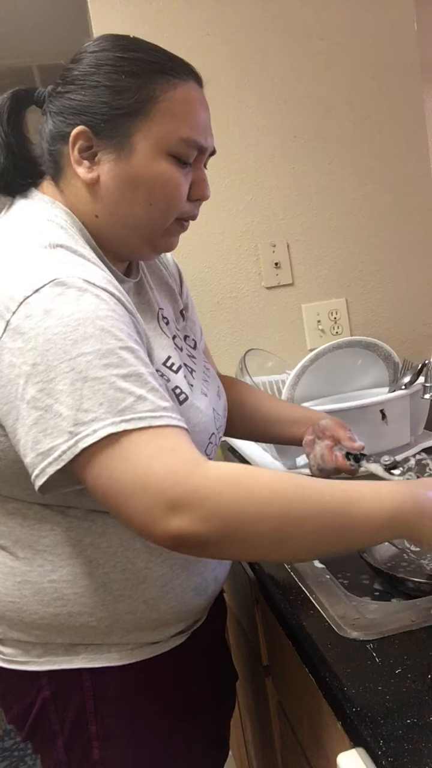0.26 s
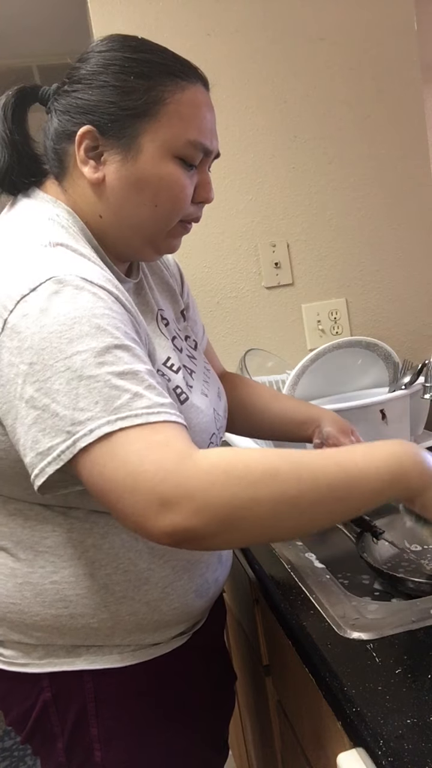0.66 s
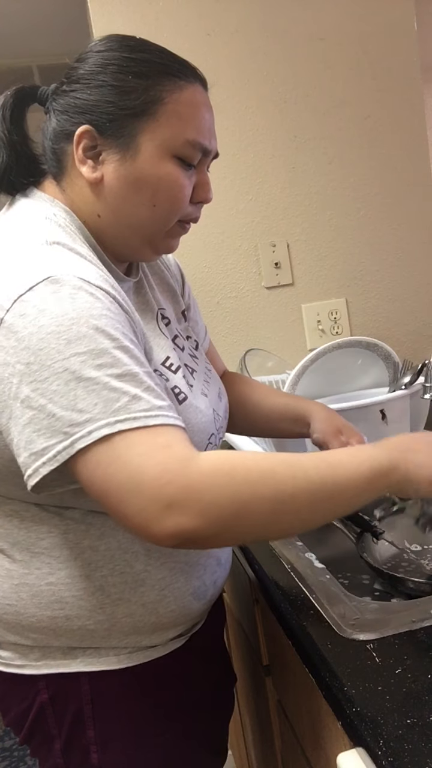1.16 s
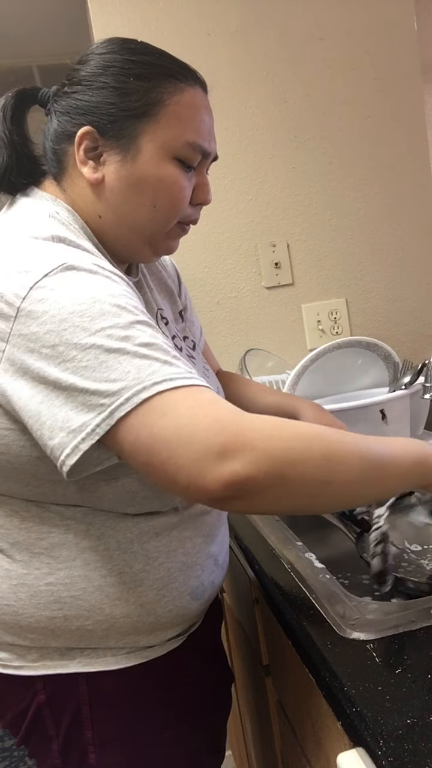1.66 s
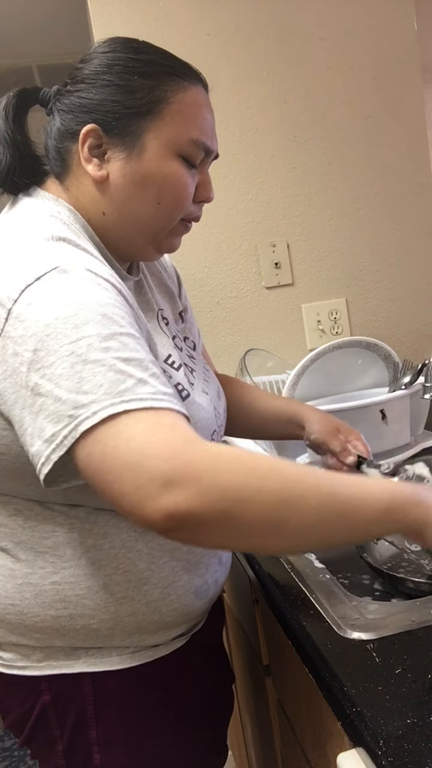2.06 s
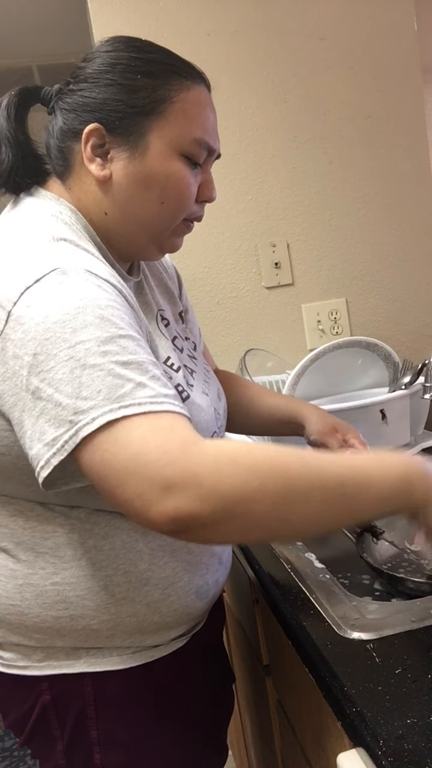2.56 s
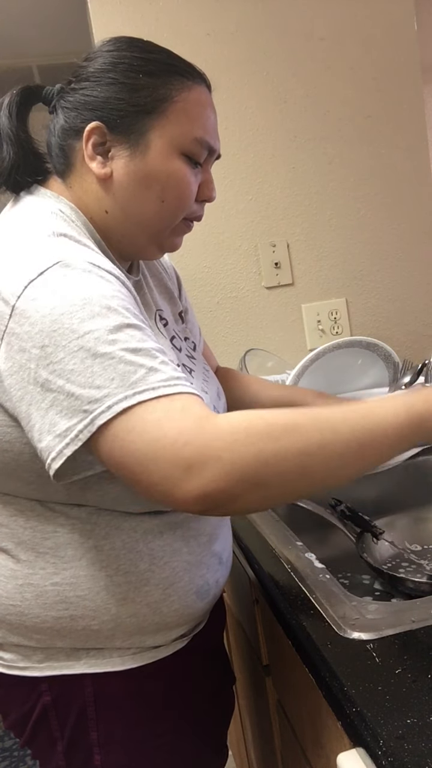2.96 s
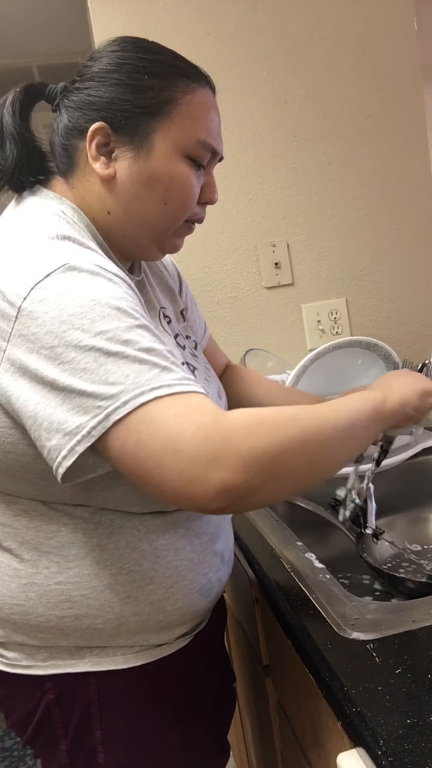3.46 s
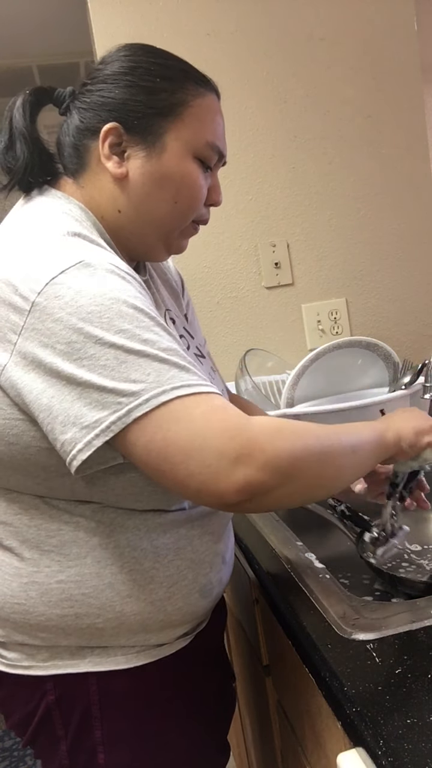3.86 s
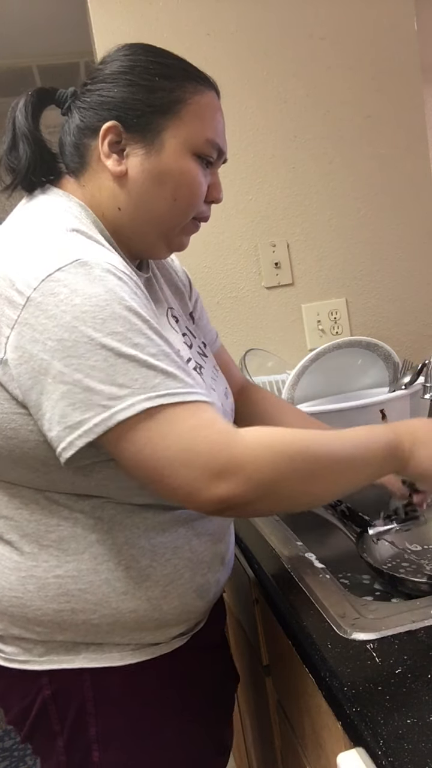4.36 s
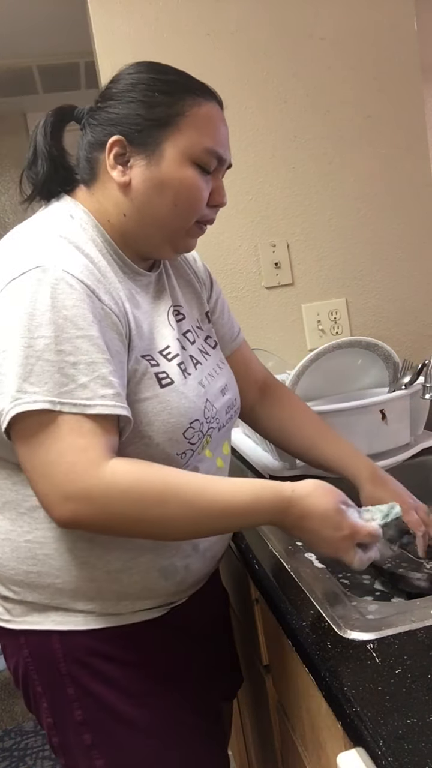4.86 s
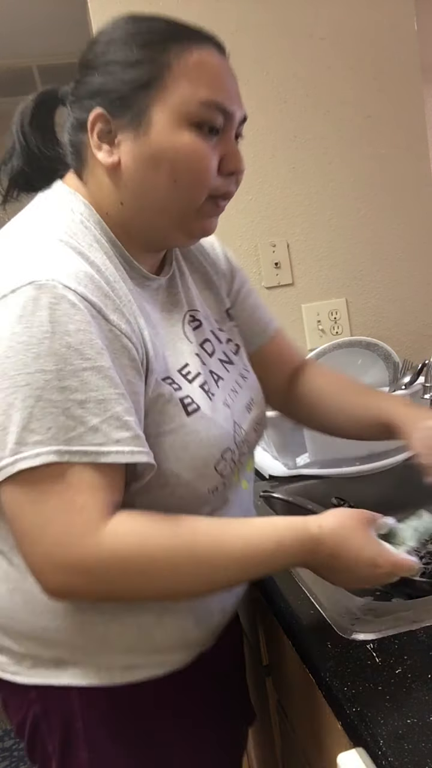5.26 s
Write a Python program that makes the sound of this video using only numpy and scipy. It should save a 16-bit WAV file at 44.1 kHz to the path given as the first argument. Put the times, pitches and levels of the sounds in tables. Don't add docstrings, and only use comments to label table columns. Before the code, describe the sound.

Quiet wet cloth squelches, rubs and small metal ticks at a kitchen sink, then a pan crashes loudly into the steel basin and bounces, ringing.

```python
import sys
import numpy as np
from scipy import signal
from scipy.fft import rfft, irfft
from scipy.io import wavfile
from scipy.ndimage import uniform_filter1d

SR = 44100
rng = np.random.default_rng(int(sys.argv[2]) if len(sys.argv) > 2 else 0)


def digitize_waveform(pressure):
    field = np.atleast_2d(pressure).T
    bounded = np.clip(field, -1, 1)
    quanta = np.round(bounded * 32767).astype(np.int16)
    wavfile.write(sys.argv[1], SR, quanta)


def voltage_ratio(decibels):
    exponent = np.asarray(decibels, float) / 20
    return 10 ** exponent


N = 243431

# start_s, ring_level_db, free_ring_s, rocking_level_db, crash_level_db
BOUNCES = [
    (4.8289, -18.5, 0.032, -19, -13.5),
    (5.0716, -6.5, 0.021, -20.5, -18),
    (5.2773, -19, 0.025, -34, -32.5),
    (5.4788, -28.5, 0.0054, -39.5, -51.5),
]
# pitch_hz, level_db at bounces 1, 2, 3, 4
WALL_MODES = [(769, 1.5, -32, -46, -21), (849, 8, -1, -1, 1.5), (928.5, 3, -14, -25, -20),
              (1380, -16, -33, -33, -25), (1518, 6.5, -24, -14.5, 0), (1595, 3, -38, -25, -7),
              (1628, -20, -3.5, -27, -25), (2040, -11, -26, -21, -11), (2427, -14, -15.5, -19, -6),
              (2632, -27, -6, -18, -8), (3035, -2.5, -8.5, -16.5, -16), (3030, -10, -12, -20, -7.5),
              (3855, -19, -12, -17, -15), (4175, 2, -22, -20, -24)]
# pitch_hz, level_db
RIM_MODES = [(1870, -21), (3420, -25), (4350, -3), (4770, -23), (5340, -9), (5730, -6), (6270, -13),
             (6810, -12), (7075, -8.5), (7840, -19), (9395, -13), (10100, -19.5), (11250, -22),
             (12250, -23)]
# pitch_hz, level_db
HANDLE_MODES = [(1225, -9), (1736, -10), (2240, -15), (4630, -17), (5150, -19), (5920, -15), (8060, -18),
                (8480, -25), (8710, -29), (9220, -22), (11800, -21), (12400, -17), (13050, -26),
                (13800, -30)]
# free_level_db, rocking_level_db, slope_db_per_khz
RIM_SHARE = [(0, -7, 0.04), (-19, -6.5, -0.06), (-20, -6, -1), (-12, -8, -1.75)]
# pitch_hz, width_hz, level_db after bounce 1, after 2, after both 3 and 4
ROCKING_MODES = [(860, 63, -1.5, 1, -2), (1076, 15, -29, -25, -7), (1539, 55, 0, -16.5, -3),
                 (1620, 42, -7, -7, -3), (2460, 25, -16, -7, -18), (2600, 40, -16, -8, -2.5),
                 (2750, 36, -26, -1.5, -10), (2900, 22, -22, -5, -14), (3080, 115, -16, -4.5, -12),
                 (3200, 25, -16, -12, -9), (3770, 76, -16, -10, -11), (3970, 20, -22, -19, -12),
                 (4190, 38, -6, -9, -7), (5550, 61, -18, -17, -26)]
ROCKING_T60 = [0.53, 0.31, 0.38, 0.32]
# start_s, level_db re rocking
JOLTS = [(4.876, -4.5), (4.986, -19), (5.038, -13), (5.137, -20.5), (5.2, -12.5)]
# pitch_hz, level_db
CRASH_COLOUR = [(250, -29.5), (600, -26.5), (850, 1.5), (1200, -14), (1600, -9), (2200, -17), (3000, -12.5),
                (4300, -9.5), (5000, -21), (8000, -25.5), (16000, -72)]
# pitch_hz, level_db, t60_s
BASIN_MODES = [(59.8, -2, 0.64), (79, -6, 0.1), (165.5, -1, 0.49), (229.2, -0.5, 0.43), (293, -1.5, .9),
               (311.3, -6, 0.72), (386, -9, 0.38), (444, -9, 0.29), (542, -9, 0.37)]
THUD_DB = [-31, -41.5, -56, -51]
# start_s, level_db
BUMPS = [
    (2.14, -55.5),
    (2.201, -67),
    (4.118, -78),
]
# start_s, level_db, t60_s
SPRAY = [
    (4.829, -22.5, 0.018),
    (4.832, -37, 0.61),
    (4.985, -44.5, 0.12),
    (5.071, -38.5, 0.28),
    (5.277, -71, 0.25),
    (5.313, -66, 0.12),
]
# pitch_hz, level_db
SPRAY_COLOUR = [(5000, -26), (9000, -2.0), (12300, -8), (13500, -7), (16000, -7.5)]

# start_s, effort_db, soak_db (plus is soggy and low, minus foamy and high)
WRINGING = [(0.0, -78.5, 3), (.33, -73.5, 1.5), (.52, -77, 1.5), (.73, -81, -2), (1.02, -71, 2),
            (1.38, -72, -0.5), (1.53, -63, 0.5), (1.68, -87, -8), (1.84, -71.5, 0.5), (2.17, -81, -2),
            (2.37, -74, 0.1), (2.7, -79, 2.1), (3.66, -77.5, -1), (3.78, -73, -2), (4.02, -73, 1),
            (4.37, -64.5, 0.5), (4.54, -79, 8.5), (4.8, -70.5, -6.5)]
# pitch_hz, level_db
SQUELCH = [(400, -40.5), (800, 6), (1500, 3.5), (2300, 4), (3200, -36.5)]
SLOSH = [(1800, -12.5), (2800, 0), (4200, -1.5), (5200, -20), (7000, -32)]
FIZZ = [(3800, -13), (5200, 10), (7000, 8), (8200, -14), (12000, -2), (16000, -11)]
# offset_db, soak_share (ratio)
LAYERS = [(-0.5, 1.01), (-1.5, -1.01), (-7, -0.96)]
# start_s, length_s, pitch_hz (centre),
# width_hz, level_db
STROKES = [(0.238, 0.053, 4140, 3540, -63.5), (1.312, 0.14, 1620, 900, -65), (1.324, 0.12, 3800, 1500, -67),
           (1.473, 0.13, 1710, 1100, -60.5), (1.56, 0.069, 1710, 1060, -51.5),
           (1.574, 0.065, 3330, 1800, -54), (2.096, 0.059, 2190, 500, -66),
           (2.133, 0.052, 1270, 940, -55.5), (2.353, 0.1, 1580, 915, -67.5),
           (2.444, 0.026, 1510, 2070, -54), (3.767, 0.094, 3080, 1620, -54.5),
           (3.807, 0.041, 2220, 800, -53.5), (4.349, 0.085, 3460, 1810, -58),
           (4.803, 0.045, 1970, 2540, -45), (3.401, 0.03, 1880, 696, -63.5),
           (1.646, .022, 2600, 2520, -51.5), (5.422, 0.1, 2150, 1880, -56)]
# start_s, length_s, pitch_hz, level_db
SQUEAKS = [
    (2.683, 0.18, 2040, -73.5),
    (3.81, 0.097, 1860, -67.5),
    (4.738, 0.06, 1360, -67),
]

# start_s, ping_level_db, low_knock_db re ping, middle_ring_db re ping
TICKS = [(0.262, -44, -13, -4), (0.7462, -56.5, -7, -11), (0.776, -46.5, 6, 4.5), (0.9142, -59, 3, 6.5),
         (1.327, -50.5, -7, -4), (1.4864, -56, 12, -5), (1.4992, -48.5, 2, -19), (1.8393, -53.5, 2, -14),
         (2.1365, -59.5, 21, 1), (2.398, -50, -12, -16), (2.605, -51, -5, 7.5), (3.0684, -64.5, -2, 13.5),
         (3.4096, -61, 3, 8), (3.8013, -45.5, 3.5, -8),  (5.4428, -57, 23.5, 17)]
# start_s, ping_level_db
DRIPS = [(0.1294, -65), (0.3594, -62), (0.398, -59.5), (1.0176, -59), (1.1529, -57), (2.0076, -57.5),
         (2.377, -61), (2.8292, -65), (3.312, -60), (3.836, -53), (0.697, -62), (3.585, -70)]
# start_s, ping_level_db, then re ping low_knock_db, middle_ring_db, treble_db
CLINKS = [(0.2514, -59.5, 8, 7, -7), (1.1668, -38.5, -7, -5, -6), (1.6497, -41, 1, 1.5, -6),
          (2.4502, -58, 11, -1, -5), (4.4085, -40, -5, -1, -10.5), (4.521, -46, -7, -1, -13),
          (4.786, -36.5, 1, -2, -18), (1.5759, -47, 1, -5, -25), (4.2877, -36.5, -6, -6.5, -15),
          (3.6142, -36.5, -7.5, -3.5, -9)]
# start_s, ping_level_db, low_knock_db re ping, middle_ring_db re ping
SNAPS = [(2.016, -48.5, -5, -15), (3.819, -51, -7, -1), (4.37, -49, -17, -8), (4.3763, -37, -20, -5),
         (4.398, -35.5, -11, -7)]

# pitch_hz, t60_s
ROOM_T60 = [(200, 1), (800, 0.25), (2000, 0.64), (5000, 0.42), (10000, 0.56), (16000, 0.13)]
# pitch_hz, level_db
AIR_COLOUR = [(20, -45), (35, -9.5), (60, -6), (100, -7), (160, -5.5), (250, -9), (450, -15), (560, -22),
              (1000, -23.5), (1700, -27.5), (3000, -35), (4500, -39), (8000, -45), (16000, -52)]
# pitch_hz, width_hz, level_db
HUM_LINES = [(63.2, 8.3, -79), (147.4, 14.4, -66), (170.6, 9.9, -66), (231, 16, -74.5), (297.6, 9.1, -75.5),
             (457.5, 9.2, -81), (758, 16, -80.5)]


def evened(x):
    return x / np.sqrt(np.mean(x ** 2) + 1e-20)


def read(points, hz):
    f, value = np.transpose(points)
    return np.interp(np.log(hz + 1), np.log(f + 1), value)


def add(mix, start_s, sound):
    part = mix[round(start_s * SR):][:len(sound)]
    part += sound[:len(part)]


def colour(x, points):
    hz = abs(np.fft.fftfreq(4096, 1 / SR))
    log_gain = np.log(voltage_ratio(np.maximum(read(points, hz), -100)))
    response = np.exp(np.conj(signal.hilbert(log_gain)))
    taps = np.fft.ifft(response).real[:2048]
    return signal.oaconvolve(x, taps)[:len(x)]


def resonate(x, hz, width_hz):
    r = np.exp(-np.pi * width_hz / SR)
    pole = r * np.exp(2j * np.pi * hz / SR)
    return 2 * signal.lfilter([1 - r], [1, -pole], x).real


def ring(modes, t):
    hz, db, t60 = np.transpose(modes)[:, :, None]
    decay = voltage_ratio(db - 60 * t / np.clip(t60, .02, 1.2))
    return (decay * np.sin(2 * np.pi * hz * t)).sum(0)


def grains(size, grain_db, per_s):
    big = voltage_ratio(grain_db * np.minimum(rng.exponential(1, size), 5))
    return big * (rng.random(size) < per_s / SR) * rng.standard_normal(size)


def free_ring(k, t):
    free_db, _, slope_db = RIM_SHARE[k]
    ring_t60 = .45
    modes = [(f, g[k], ring_t60) for f, *g in WALL_MODES]
    modes += [(f, g + free_db + slope_db * f / 1e3, ring_t60) for f, g in RIM_MODES + HANDLE_MODES]
    swing = 1 - 0.7 * np.exp(-t / 0.004)
    return ring(modes, t) * swing


def rocking(k, t):
    _, held_db, slope_db = RIM_SHARE[k]
    rim_width_hz, skirt = 34, 3.5
    modes = [(f, w, g[min(k, len(g) - 1)], 0 * t) for f, w, *g in ROCKING_MODES]
    for f, g in RIM_MODES + HANDLE_MODES:
        fade_db = -70 * t * f / 20000.0
        modes.append((f, rim_width_hz, g + held_db + slope_db * f / 1e3, fade_db))
    shake = rng.standard_normal(len(t))
    blur = np.zeros(len(t))
    for f, w, g, fade_db in modes:
        line = resonate(resonate(shake, f, 0.87 * w), f, skirt * w)
        blur += voltage_ratio(g + fade_db) * line
    return evened(blur)


def contact_force(k, start_s, touch, t):
    force = voltage_ratio(-60 * t / ROCKING_T60[k]) * (.2 + .8 * touch)
    for at_s, jolt_db in JOLTS:
        belongs = 0 < at_s - start_s < .22
        since = np.maximum(t + start_s - at_s, 0) * belongs
        force = force + voltage_ratio(jolt_db - 60 * since / 0.14) * (1 - np.exp(-since / 0.00098))
    return force


def basin_crash(crash_db, touch, t):
    crash = evened(colour(rng.standard_normal(len(t)), CRASH_COLOUR))
    decay = voltage_ratio(-60 * t / 0.34) + 1.8 * voltage_ratio(-60 * t / 0.015)
    return crash * voltage_ratio(crash_db - 6.1 * touch) * decay


def pan():
    t, out = np.arange(round(.7 * SR)) / SR, np.zeros(N)
    for k, (start_s, ring_db, free_s, rock_db, crash_db) in enumerate(BOUNCES):
        touch = 1 / (1 + np.exp(np.clip((free_s - t) / 0.0047, -50, 50)))
        tone = voltage_ratio(ring_db) * free_ring(k, t) * (1 - touch)
        rocked = voltage_ratio(rock_db) * contact_force(k, start_s, touch, t) * rocking(k, t)
        crash = basin_crash(crash_db, touch, t)
        thud = voltage_ratio(THUD_DB[k]) * ring(BASIN_MODES, t) * (1 - np.exp(-t / 0.021))
        onset = np.minimum(t / .0005, 1)
        add(out, start_s, (tone + rocked + crash) * onset + thud)
    for start_s, db in BUMPS:
        add(out, start_s, voltage_ratio(db) * ring(BASIN_MODES, t) * voltage_ratio(-60 * t / .5))
    return out


def spray():
    t, level = np.arange(SR // 2) / SR, np.zeros(N)
    for start_s, db, t60 in SPRAY:
        add(level, start_s, voltage_ratio(db - 60 * t / t60))
    hiss = colour(rng.standard_normal(N), SPRAY_COLOUR)
    return evened(hiss) * level


def cloth(lump_db=0.5):
    start_s, effort_db, soak_db = np.transpose(WRINGING)
    t, out = np.arange(N) / SR, np.zeros(N)
    lumps = evened(uniform_filter1d(rng.standard_normal(N), 500))
    for points, (offset_db, share) in zip((SQUELCH, SLOSH, FIZZ), LAYERS):
        bursts = grains(N, grain_db=-0.5, per_s=4000)
        water = evened(colour(bursts, points) * voltage_ratio(lump_db * lumps))
        level_db = np.interp(t, start_s, effort_db + offset_db + share * soak_db, right=-80)
        out += water * voltage_ratio(level_db)
    return out


def strokes():
    out = np.zeros(N)
    for start_s, length_s, hz, width_hz, db in STROKES:
        rub = grains(SR // 4, grain_db=0.5, per_s=3600)[:round(length_s * SR)]
        rub = evened(resonate(resonate(rub, hz, width_hz), hz, width_hz))
        add(out, start_s, voltage_ratio(db) * rub * signal.windows.tukey(len(rub), .7))
    return out


def squeaks():
    out = np.zeros(N)
    for start_s, length_s, hz, db in SQUEAKS:
        slip = resonate(rng.standard_normal(round(.2 * SR)), hz, 30)[:round(length_s * SR)]
        add(out, start_s, voltage_ratio(db) * evened(slip) * signal.windows.tukey(len(slip), .5))
    return out


def tick_rows(treble_db=-11.5, dry_db=-12):
    drips = [(s, db, 0.5, -0.5) for s, db in DRIPS]
    rows = [(*row, treble_db, 0) for row in TICKS + drips]
    rows += [(*row, 0) for row in CLINKS]
    return rows + [(*row, treble_db, dry_db) for row in SNAPS]


def ticks(echo_t60=0.12, dip_db=-4):
    t, out = np.arange(9000) / SR, np.zeros(N)
    for start_s, db, low_db, mid_db, high_db, dry_db in tick_rows():
        z = rng.standard_normal(len(t))
        snap = 3.6 * (t == 0) + .9 * z * np.exp(-t / .0008)
        echo_db = dry_db - 8 - 0.15 * (db + 47.5)
        echo = z * voltage_ratio(echo_db - 60 * t / echo_t60) * (1 - np.exp(-t / 0.0011))
        shape = [(500, low_db - 18), (1400, low_db), (2000, (low_db + mid_db) / 2 + dip_db),
                 (2750, mid_db - 3.0), (3400, mid_db / 2 + dip_db), (4300, 0.28),
                 (5200, high_db / 2 + dip_db), (7000, high_db), (11000, high_db - 14.0),
                 (16000, high_db - 12.0)]
        add(out, start_s, voltage_ratio(db + 8) * colour(snap + echo, shape))
    return out


def room(x):
    taps, at = np.zeros((3, SR)), np.arange(120, SR - 20, 20)
    places = at + rng.integers(0, 20, (3, len(at)))
    np.put_along_axis(taps, places, rng.choice([-1., 1.], (3, len(at))), 1)
    hz, t, z = signal.stft(taps, SR, nperseg=256)
    decay = voltage_ratio(-60 * t / read(ROOM_T60, hz)[:, None])
    tail = signal.istft(z * decay, SR, nperseg=256)[1]
    phase = 40 * np.arange(N) / SR + np.arange(3)[:, None] / 3
    turn = np.cos(2 * np.pi * phase) * np.sqrt(2 / 3)
    return signal.fftconvolve(x * turn, tail / np.linalg.norm(tail[0]), axes=1)[:, :N].sum(0)


def air():
    hz = np.fft.rfftfreq(N, 1 / SR)
    tone = evened(irfft(rfft(rng.standard_normal(N)) * voltage_ratio(read(AIR_COLOUR, hz)), N))
    shake = rng.standard_normal(N)
    mains = voltage_ratio(-61) * np.sin(2 * np.pi * 60.0 * np.arange(N) / SR)
    lines = sum(voltage_ratio(db) * evened(resonate(resonate(shake, f, w), f, w)) for f, w, db in HUM_LINES)
    return voltage_ratio(-61.5) * tone + lines + mains


def scene():
    metal, hands = pan(), ticks() + strokes()
    metal = signal.sosfilt(signal.butter(4, 52, "high", fs=SR, output="sos"), metal)
    wet = room(voltage_ratio(-12.0) * metal + voltage_ratio(-10.0) * hands)
    return (metal + hands + wet + squeaks() + spray() + cloth() + air())[None]


def roll_off(x):
    return signal.sosfilt(signal.butter(12, 16620, fs=SR, output="sos"), x)


def record(dry, ceiling=.74):
    limited = dry / (1 + abs(dry / ceiling) ** 4) ** .25
    high_pass = signal.butter(2, 40, "high", fs=SR, output="sos")
    limited = dry + signal.sosfilt(high_pass, limited - dry)
    edge = signal.firwin(511, 15800, window=("kaiser", 9), fs=SR)
    return roll_off(signal.oaconvolve(limited, edge[None], "same"))


dry = scene()
out = record(dry)
digitize_waveform(out)
```